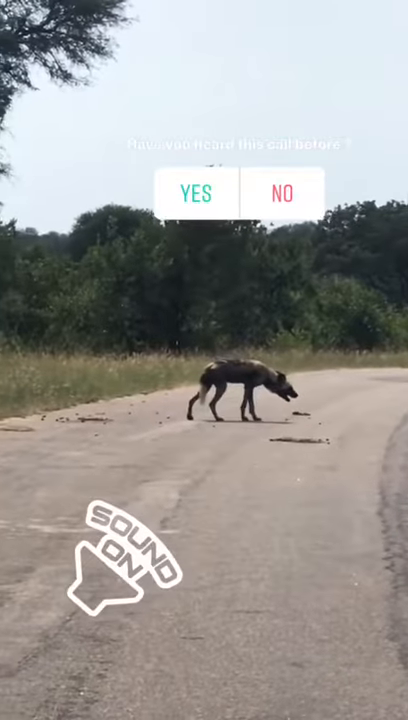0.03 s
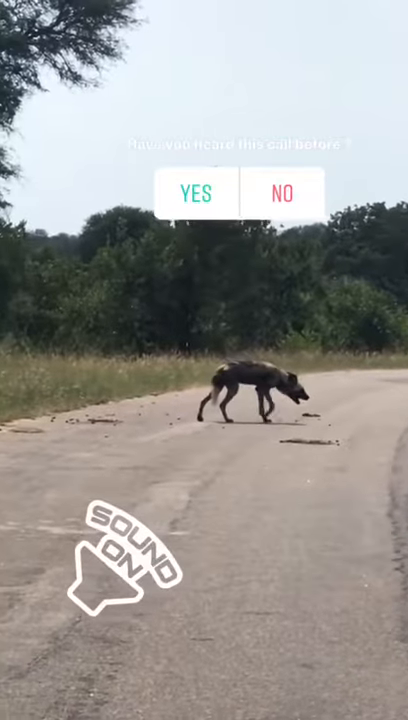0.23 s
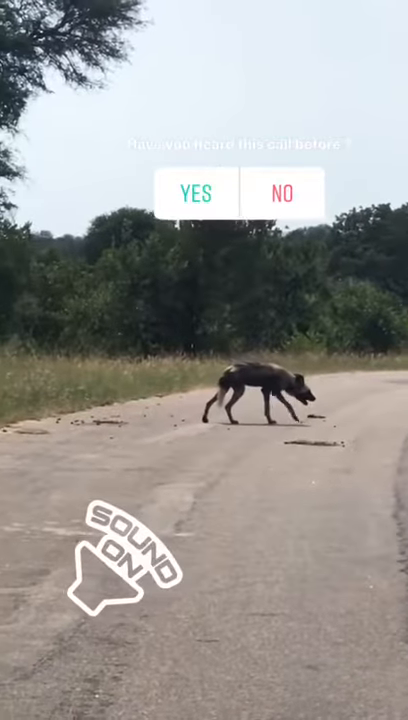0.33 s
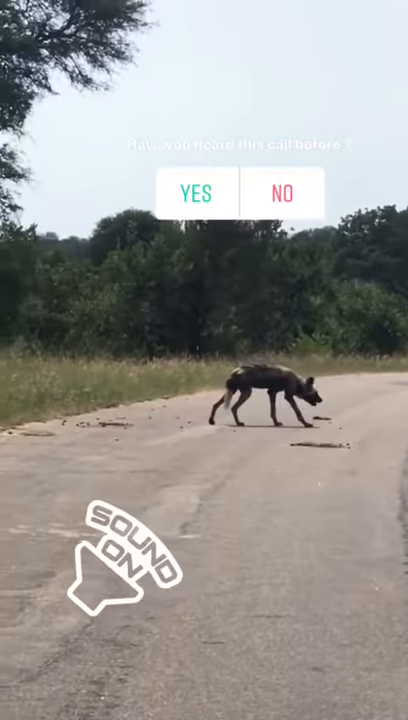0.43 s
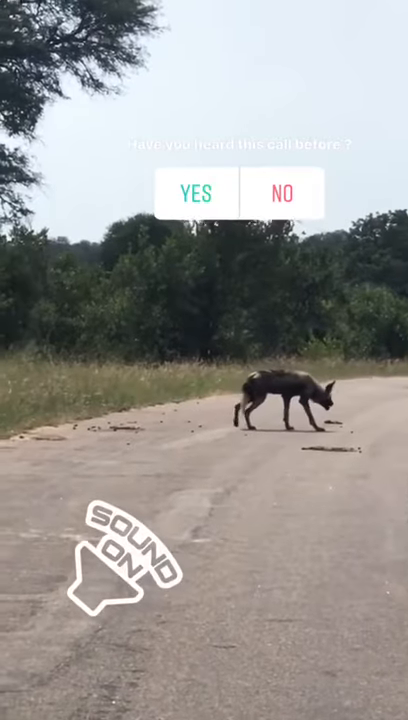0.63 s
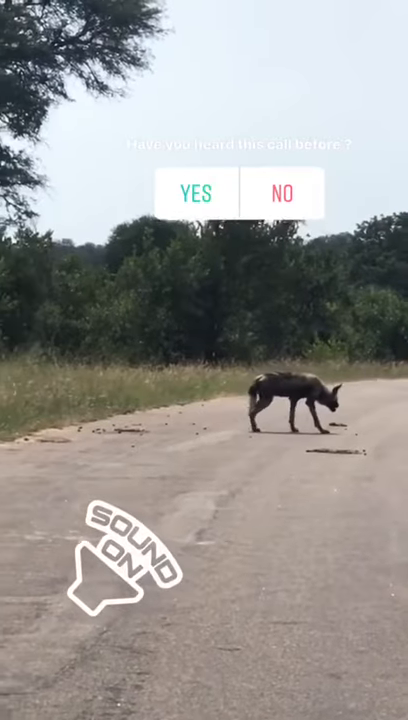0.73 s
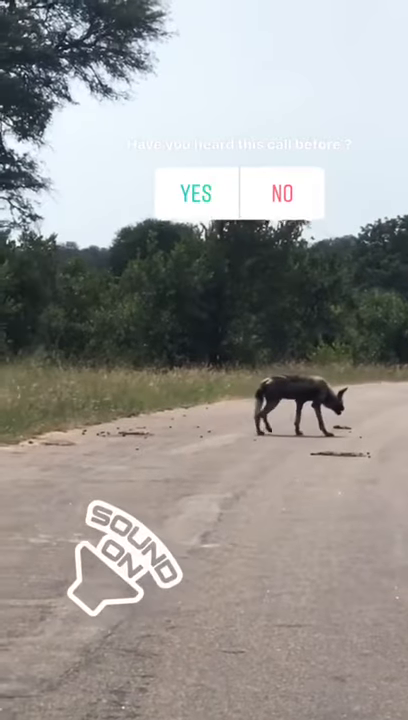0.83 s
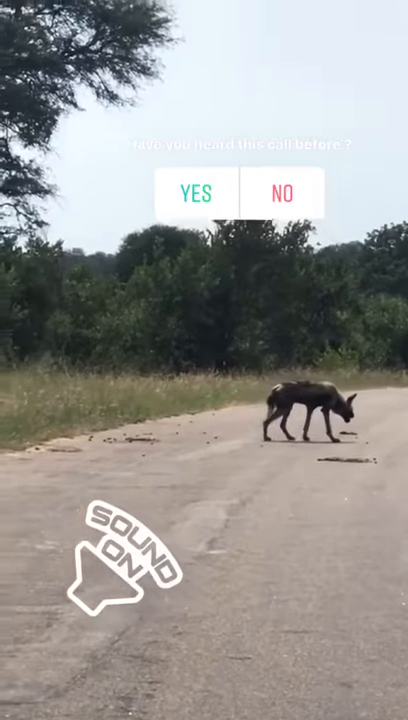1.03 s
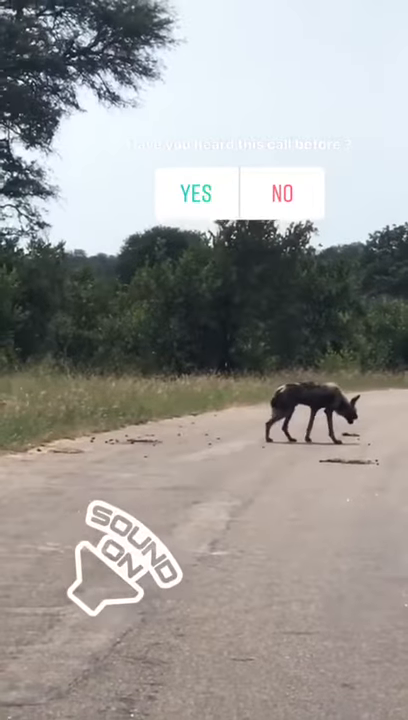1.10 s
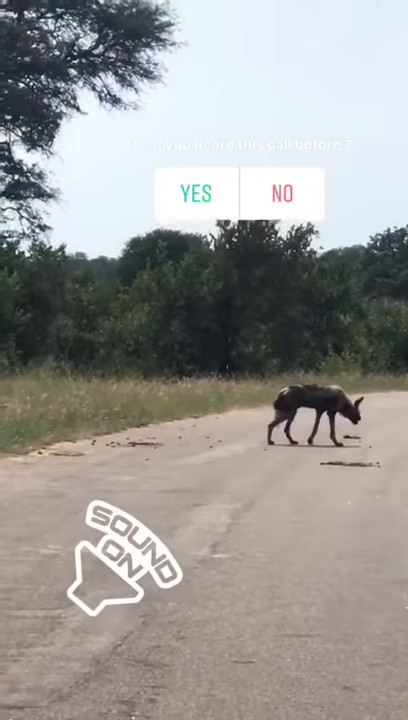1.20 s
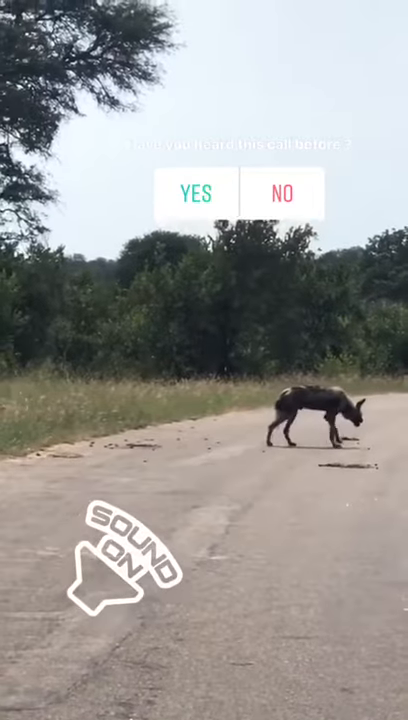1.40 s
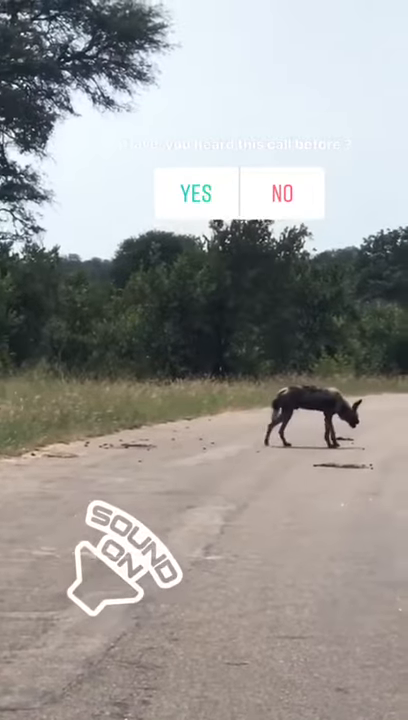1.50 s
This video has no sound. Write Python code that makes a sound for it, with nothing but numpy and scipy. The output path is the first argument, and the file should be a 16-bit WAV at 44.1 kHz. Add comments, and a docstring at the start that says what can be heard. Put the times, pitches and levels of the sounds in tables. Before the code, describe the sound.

A wild dog gives two short hoo calls outdoors, the first from about 0.2 to 0.45 seconds, the second from 1.0 to 1.3 seconds. Each slides up, holds a clean, mid-pitched hoot, then falls away hoarsely, leaving a faint echo from the trees. Throughout, much quieter, a nearby vehicle idles with a low hum and very soft rapid ticking under a steady rush of air.

```python
"""A wild dog on a bush road gives two hoo calls: each slides up, holds a clean hoot, falls away hoarsely.
Its voice is a harmonic series coloured by the throat; where it is weak, an irregular pitch roughens it.
The trees scatter the calls back as a faint echo. Close by, under a steady rush of air, a vehicle idles:
the engine and a second shaft hum at multiples of their rates of rotation over a low rumble,
and the shaft ticks softly once a turn."""
import sys
import numpy as np
from scipy import signal
from scipy.fft import rfft, irfft, next_fast_len
from scipy.io import wavfile
from scipy.ndimage import uniform_filter1d, map_coordinates

SR = 44100
rng = np.random.default_rng(int(sys.argv[2]) if len(sys.argv) > 2 else 0)


def generate_wav(sig):
    """Save sig (samples, or channels by samples) to the path in sys.argv[1] as 16-bit PCM at SR."""
    pcm = np.round(np.clip(np.atleast_2d(sig).T, -1, 1) * 32767).astype(np.int16)
    wavfile.write(sys.argv[1], SR, pcm)


N = 68355

# Hum of the engine and of the second shaft. Each row: multiple of the rotation rate, level in dB.
ENGINE_HARMONICS = [(4, -55), (5, -62.5), (6, -53), (8, -56.5), (10, -59.5), (14, -67), (18, -59.5)]
SHAFT_HARMONICS = [(2, -62), (3, -51.5), (6, -61)]
# Spectra of the four noises. Each row: frequency in Hz, relative level in dB.
RUMBLE_SPECTRUM = [(25, -71), (50, -65), (100, 4), (150, 1), (190, 3.5), (235, 9), (290, 6), (340, -2),
                   (450, -33.5)]
AIR_SPECTRUM = [(190, -14), (330, -4), (500, -3), (750, -5), (1000, -6.5), (1280, -9.5), (1700, -14.5),
                (2200, -17), (2900, -21), (3400, -20), (4000, -19.5), (5000, -24.5), (6000, -24),
                (7000, -28), (9000, -31), (10700, -35.5), (11900, -46.5)]
TICK_SPECTRUM = [(2000, -27), (4000, 2), (7000, 1), (9000, -7), (10700, 4.5), (11800, -10.5)]
RASP_SPECTRUM = [(300, -27), (600, -3), (850, 0.5), (1250, -26), (1650, -4), (2150, -30), (2600, -6.5),
                 (3300, -37), (4600, -18), (5500, -22.5), (7100, -25), (7900, -11.5), (9000, -28),
                 (11000, -29.5)]
# The course of the voice, one table a call.
# Each row: time in seconds, pitch in Hz, level of the fundamental in dB, of the second harmonic in dB.
CALL_CONTOURS = [
    [(0.172, 373.7, -45, -42), (0.178, 380, -69, -35), (0.184, 454, -54.5, -41.5), (0.2, 495.7, -42, -36),
     (0.224, 530, -40, -28), (0.232, 572.5, -33, -33.5), (0.25, 611, -28.5, -38.5),
     (0.284, 620.8, -22, -41.5), (0.33, 628.1, -20.5, -41.5), (0.376, 619.2, -22, -39),
     (0.4, 609.4, -24, -41), (0.408, 606, -26.5, -36), (0.43, 575, -35.5, -47), (0.442, 517, -45, -63),
     (0.452, 440, -62, -47)],
    [(1.003, 372, -63, -44.5), (1.011, 387, -70, -34.5), (1.017, 460.3, -55, -38),
     (1.033, 501.2, -44.5, -29.5), (1.057, 539, -36, -22.5), (1.067, 583.5, -32.5, -34),
     (1.081, 611.5, -31, -37), (1.109, 615.8, -24.5, -40), (1.163, 619.4, -22, -40),
     (1.203, 614.2, -24, -41), (1.231, 602.2, -32, -36.5), (1.243, 591, -30, -47),
     (1.255, 582.6, -29.5, -46), (1.265, 575, -38.5, -45), (1.271, 537, -43, -54), (1.283, 450.4, -62, -45),
     (1.294, 397, -51.5, -41.5)],
]
# Throat response for the upper harmonics. Each row: frequency in Hz, gain in dB in call one, in call two.
THROAT_RESPONSE = [(1580, -23, -19), (1797, -21, -13), (1866, -17, -14.5), (2160, -28.5, -41),
                   (2280, -37, -36), (2382, -23.5, -28), (2710, -27, -22), (2930, -54, -57),
                   (3718, -35.5, -32), (4070, -51, -41.5), (4454, -29, -46), (5290, -45.5, -35.5),
                   (5550, -42, -34.5), (5510, -36, -50), (6060, -53.5, -53), (7700, -51, -55.5),
                   (8200, -47, -33.5), (8470, -47, -47), (9300, -56, -50.5), (10200, -54, -52),
                   (11200, -61.5, -56.5)]
# Change of that response during a call. Each row: frequency in Hz, slope in dB per second.
THROAT_SLOPE = [(1850, 9), (2450, 0), (3100, 33.5), (3700, 42), (4400, 2), (4950, -21), (5550, -69),
                (6500, -3.5), (8100, 59.5), (9300, -13)]
# Reverberation of the bush. Each row: frequency in Hz, time to decay by 60 dB in seconds.
BUSH_DECAY = [(300, 0.43), (1800, 1), (4000, 1), (10000, .3)]

ENGINE_HZ, SHAFT_HZ = 16.47, 19.53  # engine cycles and shaft turns a second
CLEAN_JITTER, HOARSE_JITTER = 0.0014, 0.02255  # fractions of the pitch
HOARSE_BELOW_DB, HOARSE_RANGE_DB = -40.5, 1.5
UPPER_GROWTH = 0.73  # dB of upper harmonics per dB of fundamental


def amp(db):
    """Amplitude ratio for a level in decibels."""
    return 10 ** (np.asarray(db) / 20)


def unit_rms(x):
    """Normalisation to an rms of 1."""
    return x / np.sqrt(np.mean(x ** 2) + 1e-20)


def curve_at(points, hz):
    """Interpolation of (Hz, value) points on a logarithmic frequency axis."""
    point_hz, values = np.transpose(points)
    return np.interp(np.log(hz + 1), np.log(point_hz + 1), values)


def wobble(rate):
    """Smooth random modulation: a spline through `rate` Gaussian values a second."""
    return map_coordinates(rng.standard_normal(4096), [np.arange(N) * rate / SR], mode="mirror")


def filtered(x, response):
    """Linear filtering: the spectrum of x is multiplied by a frequency response."""
    size = next_fast_len(N + SR // 2)
    return irfft(rfft(x, size) * response(np.fft.rfftfreq(size, 1 / SR)), size)[:N]


def noise(spectrum):
    """Spectral shaping of white noise, at an rms of 1."""
    return unit_rms(filtered(rng.standard_normal(N), lambda hz: amp(curve_at(spectrum, hz))))


def rotation_hum(turn_hz, harmonics, flutter_db=0.0, speed_wander=0.00412):
    """Periodic motion radiates harmonics of its rate, which here wanders slightly."""
    phase = 2 * np.pi * np.cumsum(turn_hz * (1 + speed_wander * wobble(3.94))) / SR
    hum = np.zeros(N)
    for k, level_db in harmonics:
        hum += amp(level_db + flutter_db * wobble(9)) * np.sin(k * phase + rng.uniform(0, 2 * np.pi))
    return np.sqrt(2) * hum


def idling_vehicle(rumble_db=-51.5):
    """Beating: neighbouring harmonics of engine and shaft interfere, over a low rumble."""
    engine = rotation_hum(ENGINE_HZ, ENGINE_HARMONICS)
    shaft = rotation_hum(SHAFT_HZ, SHAFT_HARMONICS, flutter_db=0.7)
    return engine + shaft + amp(rumble_db) * noise(RUMBLE_SPECTRUM)


def air_rush(level_db=-49.5, waver_db=0.18):
    """Broadband noise under slight amplitude modulation is heard as a steady rush."""
    return amp(level_db + waver_db * wobble(13)) * noise(AIR_SPECTRUM)


def shaft_ticks(first_s=0.028, width_s=0.0053, level_db=-61.5, scatter_db=1.1):
    """Periodic friction: the shaft scuffs once a turn, giving a soft pulse of treble noise."""
    turns = (np.arange(N) / SR - first_s) * SHAFT_HZ
    from_tick_s = (turns - np.round(turns)) / SHAFT_HZ
    pulses = np.exp(-.5 * (from_tick_s / width_s) ** 2)
    return amp(level_db + scatter_db * wobble(55)) * pulses * noise(TICK_SPECTRUM)


def hoo_call(contour, throat, onset_s=0.0097, release_s=0.01, drift_db=2.5, shimmer_db=0.27):
    """Source and filter: the throat colours a harmonic voice, which jitter makes hoarse when weak."""
    t = np.arange(N) / SR
    times, *tracks = np.transpose(contour)
    start, end = times[0], times[-1]
    pitch, first_db, second_db = [uniform_filter1d(np.interp(t, times, y), size=180) for y in tracks]
    voice_db = 20 * np.log10(np.hypot(amp(first_db), amp(second_db)))
    hoarseness = .5 - .5 * np.tanh((voice_db - HOARSE_BELOW_DB) / HOARSE_RANGE_DB)
    jitter = (CLEAN_JITTER + HOARSE_JITTER * hoarseness) * wobble(400)
    phase = 2 * np.pi * np.cumsum(pitch * (1 + jitter)) / SR
    voice = amp(first_db) * np.sin(phase) + amp(second_db) * np.sin(2 * phase)
    upper_db = first_db.max() + UPPER_GROWTH * (first_db - first_db.max())
    from_middle_s = np.clip(t, start, end) - (start + end) / 2
    for k in range(3, 20):
        wander_db = drift_db * (k > 4) * wobble(28)
        colour_db = curve_at(throat, k * pitch) + curve_at(THROAT_SLOPE, k * pitch) * from_middle_s
        voice += amp(upper_db + colour_db + wander_db) * np.sin(k * phase)
    rasp = closing_rasp(t - end, phase)
    gate = np.clip(1 + (t - start) / onset_s, 0, 1) * np.clip(1 - (t - end) / release_s, 0, 1)
    return gate * np.sqrt(2) * voice * amp(shimmer_db * wobble(150)) + rasp


def closing_rasp(from_end_s, voice_phase, level_db=-47.5, lead_s=0.016, half_width_s=0.017):
    """Amplitude modulation of noise at the pitch of the voice gives a call its husky close."""
    envelope = amp(level_db) * np.exp(-((from_end_s + lead_s) / half_width_s) ** 2)
    return envelope * unit_rms(noise(RASP_SPECTRUM) * (1 + .5 * np.cos(voice_phase)))


def bush_echo(x, gain_db=-23, delay_s=.015):
    """Scattering from trees: a delayed, diffuse tail that lasts longest in the middle frequencies."""
    hz, t, spectra = signal.stft(rng.standard_normal(SR), SR, nperseg=256)
    decay = amp(-60 * t / curve_at(BUSH_DECAY, hz)[:, None])
    tail = signal.istft(spectra * decay, SR, nperseg=256)[1]
    delayed = np.pad(x, (int(delay_s * SR), 0))
    return amp(gain_db) * signal.fftconvolve(delayed, tail / np.linalg.norm(tail))[:N]


def scene():
    """Superposition of the calls, their echo, the vehicle and the air in one channel."""
    hz, *gains_db = np.transpose(THROAT_RESPONSE)
    throats = [np.column_stack([hz, db]) for db in gains_db]
    dog = sum(hoo_call(contour, throat) for contour, throat in zip(CALL_CONTOURS, throats))
    return (dog + bush_echo(dog) + idling_vehicle() + shaft_ticks() + air_rush())[None]


def record(dry):
    """Band limiting: an ideal low-pass filter removes the highest treble."""
    cutoff_hz = 11900
    return np.array([filtered(x, lambda hz: hz < cutoff_hz) for x in dry])


dry = scene()
out = record(dry)
generate_wav(out)
```